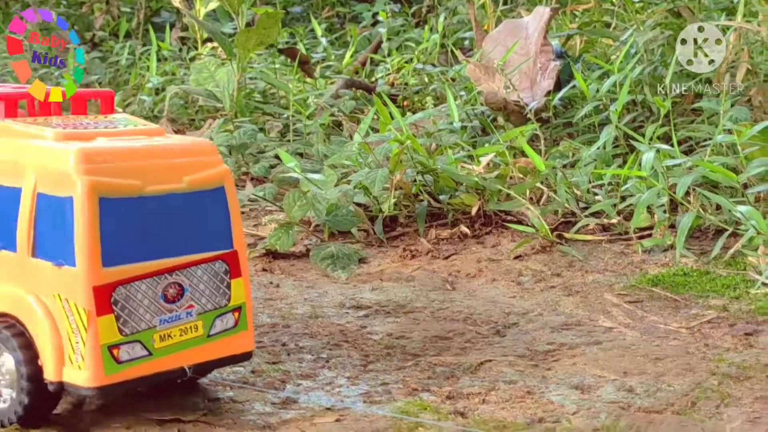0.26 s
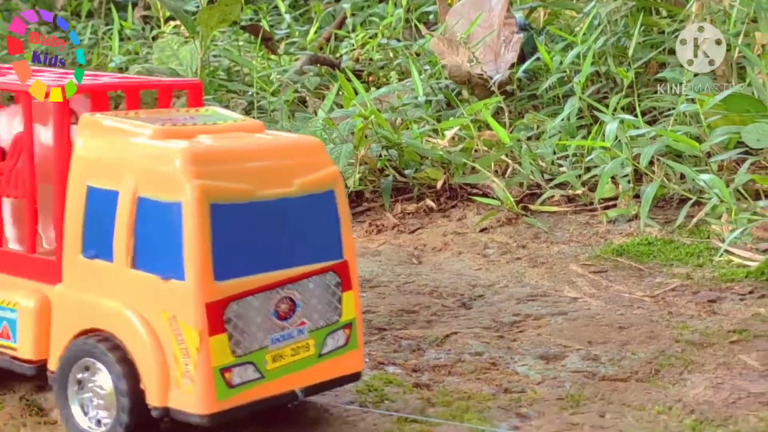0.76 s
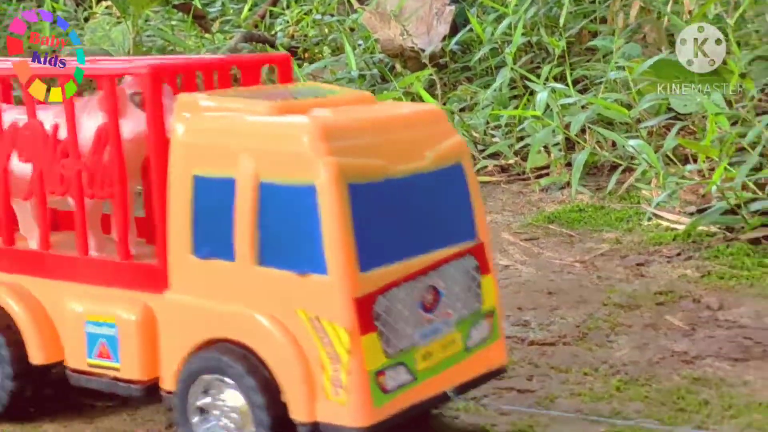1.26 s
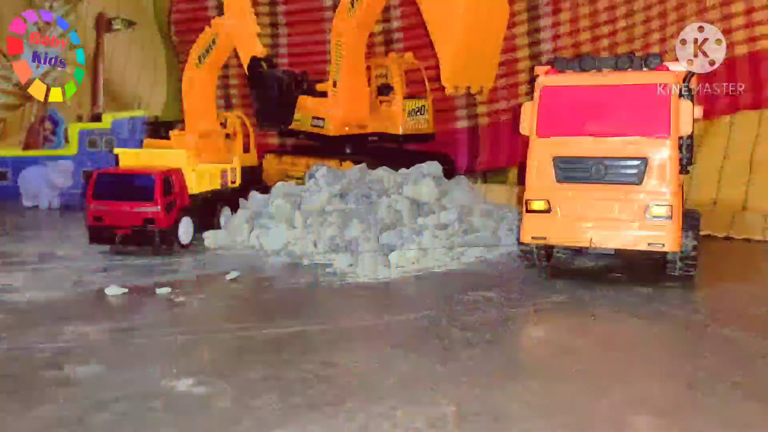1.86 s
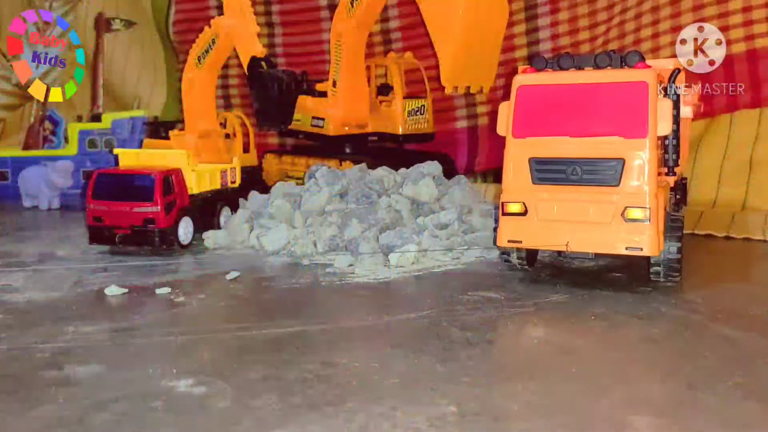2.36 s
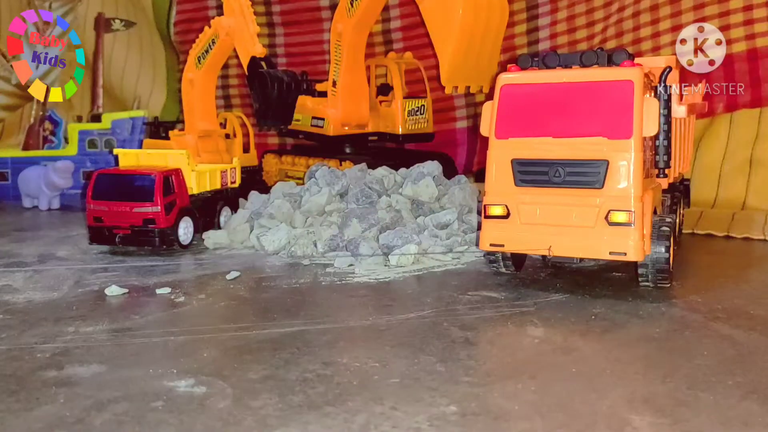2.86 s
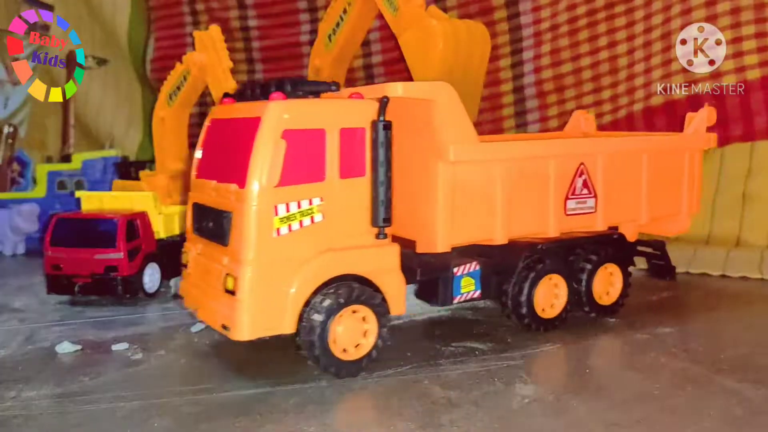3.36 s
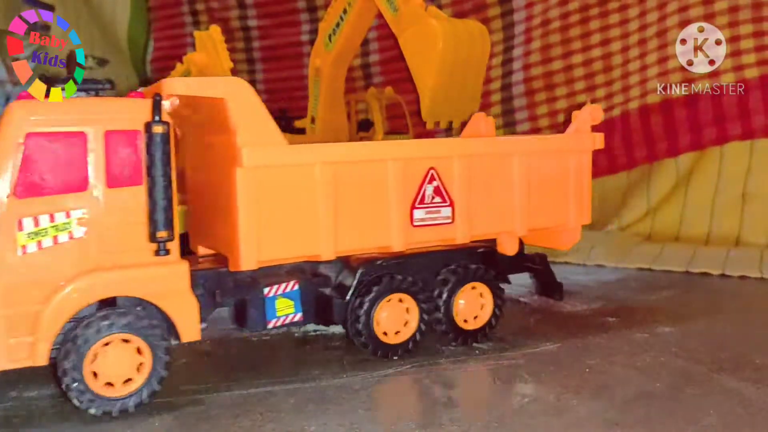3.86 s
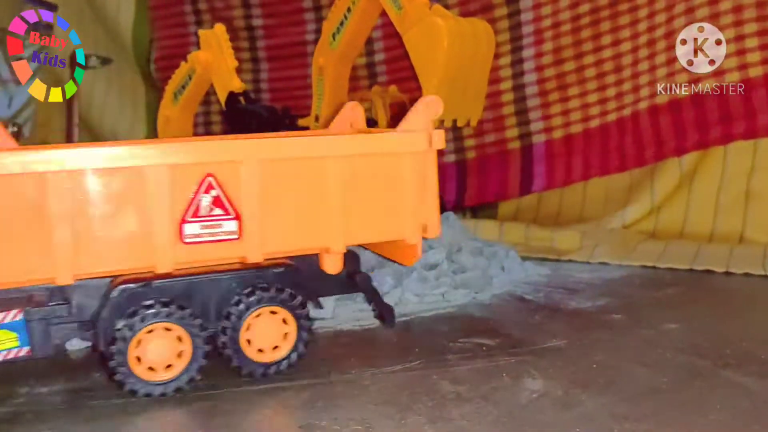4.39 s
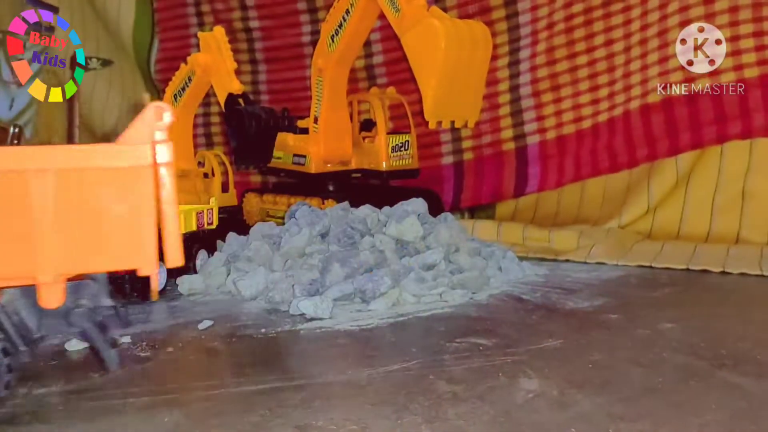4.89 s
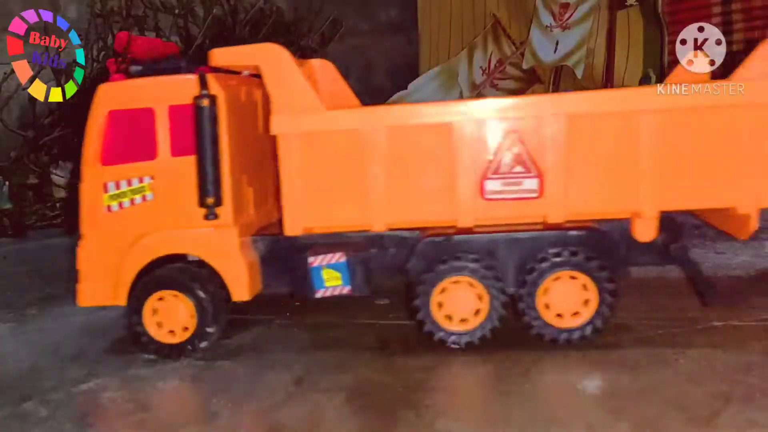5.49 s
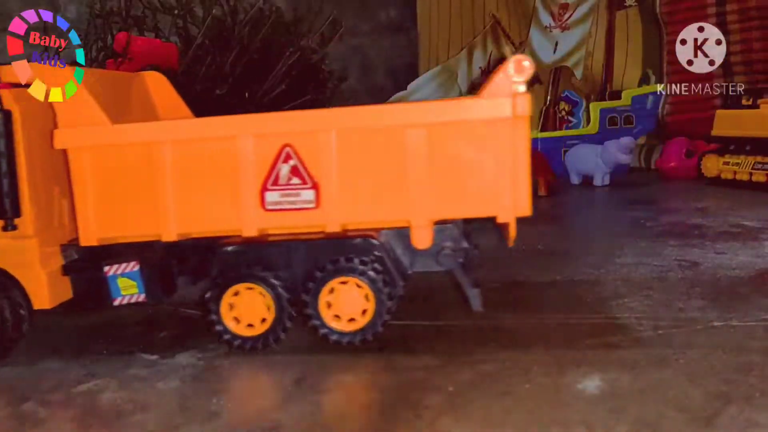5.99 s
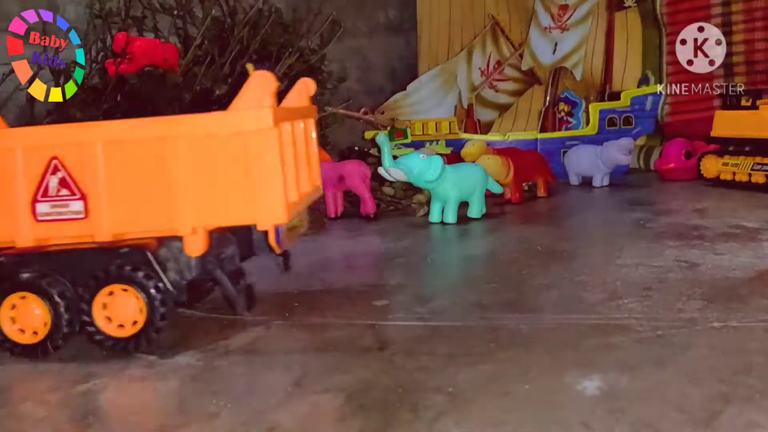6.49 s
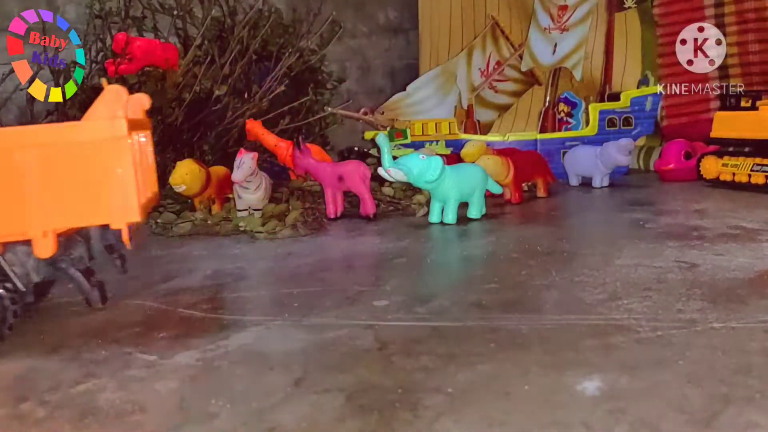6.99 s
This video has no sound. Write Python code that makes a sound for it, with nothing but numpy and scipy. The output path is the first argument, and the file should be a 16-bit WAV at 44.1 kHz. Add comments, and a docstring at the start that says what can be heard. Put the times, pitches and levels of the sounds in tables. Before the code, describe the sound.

A plastic toy truck rolls over concrete close by, its gears whirring and clicking, with a scrubbing shove and soft knocks.

```python
"""Flywheel toy truck on concrete

Close to a phone's microphone, a plastic truck's gears spin down, teeth clicking in the hollow shell. Two
seconds in, a shove scrubs the wheels and the truck turns, changing its tone. The whole run then sounds a second
time, overlapping the first as it whirs on. Soft knocks and a low rumble reach the phone through its body; a
rustle swells underneath."""
import sys
import numpy as np
from scipy import signal
from scipy.io import wavfile
from scipy.ndimage import uniform_filter1d

SR = 44100
rng = np.random.default_rng(int(sys.argv[2]) if len(sys.argv) > 2 else 0)


def store_pcm(level_fs):
    """Save levels as 16-bit WAV."""
    pcm = np.round(np.clip(level_fs, -1, 1) * 32767).astype(np.int16)
    wavfile.write(sys.argv[1], SR, np.atleast_2d(pcm).T)


N = 319328


def undb(db):
    return 10 ** (np.asarray(db) / 20)


def unit(x):
    return x / np.sqrt(np.mean(x ** 2))


def band(x, hz, width, passes=1):
    """Resonance of gain 1 at its centre; more passes steepen its sides."""
    for _ in range(passes):
        x = signal.lfilter(*signal.iirpeak(hz, hz / width, SR), x)
    return x


def notch(x, gaps, depth):
    """Cancel a share of each narrow band, twice over."""
    sections = []
    for hz, width in gaps:
        b, a = signal.iirpeak(hz, hz / width, SR)
        sections += [np.r_[a - depth * b, a]] * 2
    return signal.sosfilt(sections, x)


def curve(table, t):
    """Columns of a table read at times t."""
    times, *columns = np.transpose(table)
    return [np.interp(t, times, column) for column in columns]


def walk(size, rate):
    """Random levels held 1 / rate seconds and smoothed twice."""
    hold = int(SR / rate)
    steps = np.repeat(rng.standard_normal(size // hold + 1), hold)
    return 0.9 * uniform_filter1d(uniform_filter1d(steps, hold), hold)[:size]


def wander(size, per_s=18, drift_s=0.15):
    """Quick uneven surges with no slow drift."""
    surges = walk(size, per_s)
    return surges - uniform_filter1d(surges, int(drift_s * SR))


# The low bed at the phone. Each row: time in seconds, rumble level in dB, rustle level in dB.
BED_LEVELS = [(0.0, -64, -54), (0.12, -48, -63), (0.36, -47, -64), (0.44, -38, -44.5), (0.7, -43, -49.5),
              (0.87, -44.5, -52), (1.1, -46, -67), (1.89, -45, -66), (1.95, -39, -64), (2.08, -28, -51),
              (2.17, -38, -46.5), (2.4, -44, -55), (3.4, -47, -62.5), (4.4, -46.5, -68.5),
              (4.49, -34, -48.5), (4.7, -46, -55.5), (5.64, -41, -68.5), (6.0, -45.5, -63.5),
              (7.24, -46, -72)]
# The rustle's colour. Each row: centre in Hz, width in Hz, relative level in dB.
RUSTLE_BANDS = [(242, 61, 1.5), (388, 130, -7.5), (524, 87, -7.5), (720, 260, -1.5)]
def rumble_and_rustle(t, edge_hz=315):
    """A narrow rumble flutters through the phone's body over a faint broad rustle."""
    rumble_db, rustle_db = curve(BED_LEVELS, t)
    core = unit(band(band(rng.standard_normal(N), 105, 44), 111, 55))
    shoulder = undb(-14.5) * unit(band(rng.standard_normal(N), 260, 110))
    rumble = signal.sosfilt(signal.cheby2(8, 40, edge_hz, fs=SR, output="sos"), core + shoulder)
    rumble *= undb(4.1 * walk(N, 16))
    rustle = sum(undb(db + walk(N, 8)) * band(rng.standard_normal(N), hz, width, passes=2)
                 for hz, width, db in RUSTLE_BANDS)
    return unit(rumble) * undb(rumble_db) + unit(rustle) * undb(rustle_db)


# Knocks through the phone's body. Each row: time in seconds, level in dB, pitch in Hz,
# seconds to fall 60 dB, edge level in dB against the thud.
BODY_KNOCKS = [(1.429, -26, 114, 0.12, -19), (1.553, -23.5, 117, 0.086, -40), (1.964, -24, 123, 0.13, -13),
               (1.989, -3, 112, 0.091, -32), (2.021, -16.5, 100, 0.15, -9), (2.041, 3, 127, 0.046, -27),
               (2.093, -28, 133, 0.091, -29), (2.144, -24, 118, 0.047, -5), (2.243, -8, 112, 0.052, -22),
               (3.076, -31, 102, 0.084, -33), (3.953, -27, 110, 0.078, -17), (4.25, -26.5, 110, 0.086, -36),
               (4.287, -28, 97, 0.2, -19), (4.481, -32, 132, 0.073, -19), (4.495, -33, 144, 0.038, -6),
               (4.521, -20, 111, 0.073, -30), (4.621, -17, 106.6, 0.076, -35),
               (4.694, -29, 95.3, 0.16, -27), (5.015, -37, 103, 0.28, -25), (5.422, -26, 101.5, 0.099, -26),
               (5.486, -23, 121, 0.13, -16), (6.078, -32, 111, 0.18, -44), (6.755, -34, 99, 0.147, -35),
               (6.782, -26, 96.5, 0.2, -24), (6.999, -33, 106, 0.12, -25), (7.052, -24, 105, 0.17, -38),
               (7.074, -14.5, 120, 0.037, -37), (7.128, -28, 100, 0.11, -40)]
def body_knocks(hard_rise_s=0.0056, light_rise_s=0.0144, light_below_db=-14, edge_s=0.0025):
    """A soft push rings a low thud that sags in pitch; a dull edge marks its front."""
    out, t = np.zeros(N + SR), np.arange(SR // 4) / SR
    for start, db, hz, t60, edge_db in BODY_KNOCKS:
        rise = light_rise_s if db < light_below_db else hard_rise_s
        age = np.clip(t - rise + hard_rise_s, 0, None)  # time since the front
        cycles = hz * (t + 0.0029 * (1 - np.exp(-t / 0.005)))
        attack = np.sin(np.pi / 2 * np.clip(t / rise, 0, 1)) ** 2
        thud = np.sin(2 * np.pi * cycles) * attack * undb(-60 * age / t60)
        edge = np.sin(2 * np.pi * 265 * age) * age / edge_s * np.exp(1 - age / edge_s)
        at = int((start - rise + hard_rise_s) * SR)
        out[at:at + len(t)] += undb(db) * (thud + undb(edge_db) * edge)
    return out[:N]


# Sharper taps, right at the microphone. Each row: start in seconds, level in dB, pitch in Hz.
CASE_TAPS = [(1.994, -12, 240), (2.043, -10, 232), (2.045, -25, 556), (2.144, -35, 476), (4.494, -33, 390),
             (7.074, -34, 237), (1.972, -31, 330), (2.024, -22, 380)]
def case_taps(t, rise_s=0.0022):
    """A tap on the phone's case gives a few cycles of a dull click."""
    out = 0
    for start, db, hz in CASE_TAPS:
        age = np.clip(t - start, 0, 0.05)
        envelope = age / rise_s * np.exp(1 - age / rise_s)
        out -= undb(db) * np.sin(2 * np.pi * hz * age) * envelope
    return out


# Hum with the truck facing the microphone. Each row: start in seconds, length in seconds, level in dB.
FACING_HUMS = [(-0.5, 1.45, -51.5), (1.06, 0.16, -53), (1.27, 0.082, -52), (1.456, 0.056, -50),
               (1.57, 0.1, -52)]
# Hum with the truck turned away. Each row: time in seconds, level in dB.
TURNED_HUM = [(1.95, -89), (1.97, -46), (2.04, -42.5), (2.12, -47.5), (3.1, -48.5), (4.4, -52),
              (5.2, -49.5), (7.24, -66.5)]
# The facing hum, the turned hum and its undertone. Each row: centre in Hz, width in Hz.
HUM_PITCHES = [(670, 37), (587.7, 62), (387, 32)]
# Rings beside the turned hum. Each row: centre in Hz, width in Hz, level in dB against that hum.
SIDE_RINGS = [(532, 20.4, -7.5), (860, 40, -8)]
def cavity_hum(t, edge_s=0.065, undertone_holds_until_s=2.7, fall_db_per_s=22):
    """Grit rings the air in the shell: in spells at first, lower and unbroken after the turn."""
    facing = 0
    for start, length, db in FACING_HUMS:
        inside_s = np.minimum(t - start, start + length - t)
        facing += undb(db) * np.clip(inside_s / edge_s + 0.5, 0, 1) ** 2
    turned = undb(curve(TURNED_HUM, t)[0])
    undertone = turned * undb(-14.5 - fall_db_per_s * np.clip(t - undertone_holds_until_s, 0, None))
    voices = list(zip((facing, turned, undertone), HUM_PITCHES))
    voices += [(turned * undb(db), (hz, width)) for hz, width, db in SIDE_RINGS]
    out = 0
    for gain, (hz, width) in voices:
        ring = band(rng.standard_normal(len(t)), hz, 2 * width, passes=3)
        out += gain * unit(ring * undb(2.5 * walk(len(t), 25)))
    return out


# Wheels on the concrete. Each row: centre in Hz, width in Hz, relative level in dB,
# rise in seconds, stop time in seconds.
SCRUB_BANDS = [(1110, 500, -24, .045, 3.5), (1620, 760, -3.5, 0.017, 2.21), (2703, 260, 9.5, 0.049, 2.15),
               (2900, 170, 6, 0.1, 2.15), (3360, 220, 8, 0.11, 2.15), (3780, 500, 1, 0.19, 2.21),
               (2900, 1200, 2, 0.13, 2.21), (2050, 280, 2, 0.13, 2.2), (7000, 3000, -10, 0.05, 2.21)]
def wheel_scrub(t, start_s=2.015, fade_s=0.015, level_db=-20.5):
    """The wheels scrub and squeak as the shove winds the flywheel."""
    grit = rng.standard_normal(N) * undb(1.7 * walk(N, 170))
    steady = scrub = 0
    for hz, width, db, rise, stop in SCRUB_BANDS:
        ring = undb(db) * band(band(grit, hz, 2 * width), hz, width)
        attack = np.clip((t - start_s) / rise, 0, 1)
        release = np.exp(-np.clip(t - stop, 0, None) / fade_s)
        steady += ring
        scrub += ring * attack * release
    return scrub / np.std(steady) * undb(level_db)


# The plastic shell from close by. Each row: centre in Hz, width in Hz,
# gain in dB facing the microphone, gain in dB turned away.
SHELL_MODES = [(912, 120, 14, 12), (1213, 190, -6.5, -7.5), (1549, 195, 9.5, 5), (1731, 105, 5.5, 3),
               (2013, 140, -3, -13), (2210, 130, -8, -14.5), (2685, 32, 2, -4), (2916, 150, -0.5, -4),
               (3232, 460, -3, -7.5), (3544, 79, -10.5, -8), (3810, 190, 2.5, 0), (3980, 170, -2, -6),
               (4464, 110, -1, -1.5), (4650, 96, 3, -2.5), (4735, 58, -1, 1), (4813, 68, 3, 2.5),
               (4910, 61, 0.5, 2.5), (5160, 450, -14.5, -11.5), (5760, 180, -11.5, -12),
               (5995, 190, -21, -4), (5630, 190, -15.5, -6.5), (8500, 550, -40.5, -5)]
# Where the panels cancel at the microphone, facing and turned. Each row: centre in Hz, width in Hz.
FACING_GAPS = [(810, 41), (1107, 60), (1366, 36), (1637, 73), (2220, 107), (2214, 35), (2476, 42),
               (2577, 82), (3480, 70), (4120, 63), (4130, 43), (4270, 47), (1942, 54), (2366, 36),
               (2707, 26), (3150, 26), (4600, 16), (5090, 40), (6240, 140), (7430, 640)]
TURNED_GAPS = [(790, 40), (4100, 40), (6170, 83), (3410, 63), (3670, 50), (4530, 40), (5550, 92),
               (6270, 88)]
def shell(low, middle, top, t, sway_db=2.5, sways_per_s=12, turn_s=2.0, turn_takes_s=0.051):
    """Each mode rings from the drive of its range and sways as panels flex; the turn shifts the tone."""
    facing = turned = 0
    hop = 100
    coarse = np.arange(0, len(t), hop)
    for hz, width, facing_db, turned_db in SHELL_MODES:
        drive = low if hz < 2500 else middle if hz < 5100 else top
        if drive is not None:
            sway = undb(sway_db * walk(len(coarse), hop * sways_per_s))
            ring = band(drive, hz, width) * np.interp(np.arange(len(t)), coarse, sway)
            facing += undb(facing_db) * ring
            turned += undb(turned_db) * ring
    facing = notch(facing, FACING_GAPS, depth=0.54)
    turned = notch(turned, TURNED_GAPS, depth=0.18)
    turned = signal.sosfilt(signal.butter(3, 6300, fs=SR, output="sos"), turned)  # duller far side
    turned_share = np.clip((t - turn_s) / turn_takes_s + 0.5, 0, 1)
    return (1 - turned_share) * facing + turned_share * turned


def blows(t, starts, db, bright_db, chatter=0.23, chatter_s=0.0012, sway_db=1.5):
    """Short blows, each with its own tilt and a brief chatter, rung through the shell."""
    at = np.clip(((starts - t[0]) * SR).astype(int), 0, len(t) - 1)
    tilt_db = np.clip(bright_db, -9, 9) / 2
    impulses = np.array([np.bincount(at, undb(db + side * tilt_db), len(t)) for side in (-1, 1)])
    tails = signal.lfilter([1], [1, -np.exp(-1 / (chatter_s * SR))], impulses) - impulses
    dull, bright = impulses + chatter * tails * rng.standard_normal(len(t))
    middle = dull - 0.23 * band(dull, 2800, 940)  # a short blow hardly moves the flat panels
    return shell(0.32 * dull, middle, bright, t, sway_db)


# The clicks that stand out up close. Each row: start in seconds, level in dB, brightness in dB,
# swell of the surrounding clatter in dB.
HARD_BLOWS = [(0.018, -14, 11, 7), (0.1835, -10, 1, -2), (0.2811, -13.5, 3, 2), (0.3654, -15.5, 4, -1),
              (0.5189, -12, 1, -0.5), (0.581, -10, -1, 1.5), (0.6045, -11, 0, -2), (0.679, -12, -3, -2),
              (0.768, -9.5, 2, -0.5), (0.7407, -18, 6, 2.5), (0.7987, -9, 1, 0), (0.8323, -11.5, 2, 5.5),
              (0.888, -11, 3, 5), (0.9527, -7, 3, 0.5), (0.9793, -6, 8, 3.5), (1.0258, -18, 0, 6),
              (1.127, -13.5, -5, 6), (1.1545, -13, 0, 3.5), (1.18, -8, 5, -1), (1.194, -11, -3, 1.5),
              (1.219, -9, 2, 2), (1.3844, -14, -2, 1.5), (1.5868, -8.5, 7, 7.5), (1.6393, -11, 10, 5),
              (1.6695, -9.5, 2, 0.5), (1.6947, -16, 6, -4.5), (2.076, -9, 12, 0.5), (2.0992, -5, 6, 3.5),
              (2.138, -14, 9, -0.5), (2.1774, -8.5, -11, -1.5), (2.1945, -8.5, -12, -0.5),
              (2.2408, -9, 1, 1), (2.2761, -14, -9, 6.5), (2.3413, -11, 10, 9.5), (2.5808, -4.5, 7, -4.5),
              (2.7036, -10, 5, 6.5), (2.681, -3.5, 6, 8.5), (2.7198, -1.5, 8, 5), (2.729, -8, 14, 3),
              (2.8442, -2, 5, 0.5), (2.852, -8, 6, 5), (2.856, -11, -1, 10.5), (2.9931, -2, 7, 0),
              (3.0014, -2.5, 13, 2), (3.0633, -9.5, 4, 5.5), (3.2176, -6.5, -6.5, -1), (3.227, -5, -4, 5.5),
              (3.2912, -6.5, -3, 4.5), (3.4472, -2, 8, -4), (3.505, -7, -1, 4), (3.581, -5.5, 3, 9.5),
              (3.749, -6, 4, 5.5), (3.922, -4.5, 5, 5.5), (4.107, -9, 4, 2), (4.1153, -6, 6, -0.5),
              (4.186, -6.5, 0, 3), (4.2232, -7, 5, 2.5), (4.4688, -7, 7, -2.5), (4.563, -6, 6, 6),
              (4.572, -2.5, 5, 3), (4.647, -8, 2, 5.5), (4.5978, -16, 9, 0.5), (4.656, -6.5, 6, 6),
              (4.6646, -2.5, 4, 7), (4.694, -6.5, 4, -3.5), (4.887, -4.5, 10, 1.5), (5.2833, -7, 1, 4.5),
              (5.3879, -6, 1, 9.5), (5.4346, -8.5, -3, 11.5), (5.497, -4, 3.0, 9.5), (5.5182, -5.5, -8, 5),
              (5.5732, -10, -3, 3.5), (5.5913, -7, 0.0, 3.5), (5.6655, -3, -6, 4), (5.7712, -6, 0, 9),
              (5.8, -9, -4, 8), (5.8678, -4, 4, 5.5), (6.141, -3.5, 4, 8.5), (6.159, -7, 1, 1),
              (6.218, -3.5, 8, 2.5), (6.3375, -7.5, -2, 1), (6.3536, -10, 1, 5.5), (6.207, -2.5, -1, 0.5),
              (6.2976, -12, 6, -2), (6.5486, -13, 4.0, 8.5), (6.571, -13, 9, 2.5), (6.7, -13, -1, 2),
              (6.7121, -4, 5, 5), (6.878, -8, -3, 4), (7.0265, -6.5, 0, 1), (7.0476, -5, 2, 2),
              (7.061, -11, 6, 10.5)]
def hard_blows(t):
    """The hardest tooth blows chatter more faintly but longer than the rest."""
    starts, db, bright_db, _ = np.transpose(HARD_BLOWS)
    clicks = blows(t, starts, db, bright_db, chatter=0.07, chatter_s=0.003, sway_db=0)
    impulse = signal.unit_impulse(SR // 10)
    unit_click = shell(None, impulse, impulse, np.zeros_like(impulse), sway_db=0)
    return clicks / np.abs(unit_click).max()


# The flywheel running down. Each row: time in seconds, teeth meeting per second.
TOOTH_RATE = [(-0.3, 171.77), (0.15, 167.86), (0.75, 158.39), (1.35, 150.36), (1.95, 140.82),
              (2.54, 131.67), (3.14, 124.6), (3.74, 117.09), (4.34, 109.75), (4.94, 102.2), (5.54, 96.19),
              (6.14, 90.06), (6.73, 84.81), (7.3, 80.66)]
def tooth_count(t, first_step=0.84):
    """Tooth steps turned by time t, counted from first_step at the table's first row."""
    count = np.cumsum(curve(TOOTH_RATE, t)[0]) / SR
    return count + first_step - np.interp(TOOTH_RATE[0][0], t, count)


# Off-centre shafts. Each row: teeth per turn, swing in dB at mid-run, phase in turns.
SHAFT_WOBBLE = [(34.94, 0.78, 0.98), (9.174, 1, 0.87), (7.13, 1.5, 0.64)]
def mesh_tightness(t, growth_per_s=0.33, swell_s=0.012):
    """How hard the teeth bear, in dB: tighter once a shaft turn, swelling around hard blows."""
    count = tooth_count(t)
    swing = sum(db * np.cos(2 * np.pi * (count / teeth - phase)) for teeth, db, phase in SHAFT_WOBBLE)
    swing *= 1 + growth_per_s * (t - t.mean())  # deepens as the spin slows
    coarse = t[::100]
    swells = [db * np.exp(-((coarse - at) / swell_s) ** 2) for at, _, _, db in HARD_BLOWS]
    swell = np.interp(t, coarse, np.max(swells, axis=0))
    return swing + swell - swell.mean()


def tooth_clicks(t, surge_db, scatter_db=5.5, slip_s=0.0002, ceiling_db=2.5, rebound_db=-9):
    """One blow for each tooth, uneven in force and colour, with a rebound half a step later."""
    count = tooth_count(t)
    half_steps = np.arange(2 * np.ceil(count[0]) + 2, 2 * np.floor(count[-1]) - 2)
    slip, force, colour = rng.standard_normal((len(half_steps), 3)).T
    starts = np.interp(half_steps / 2, count, t) + slip_s * slip
    # Loose play makes neighbours strike alike and limits how hard they strike.
    db = scatter_db * force + 1.5 * np.interp(starts, t, walk(len(t), 30))
    db = np.minimum(db, ceiling_db) + np.interp(starts, t, surge_db)
    db = np.minimum(db, ceiling_db) + rebound_db * (half_steps % 2)
    to_hard_blow_s = np.abs(starts[:, None] - np.array(HARD_BLOWS)[:, 0]).min(axis=1)
    free = to_hard_blow_s > 0.0015  # a hard blow takes the place of its tooth
    return unit(blows(t, starts[free], db[free], 3 * colour[free]))


# Brief dips in the clatter. Each row: centre in seconds, depth in dB.
LULLS = [(0.17, 2), (0.29, 12), (0.355, 4.5), (0.525, 0.5), (0.995, 6), (1.335, 9), (1.516, 12), (1.75, 9),
         (2.82, 1), (3.03, 7), (3.1, 0), (3.38, 4), (3.72, 11), (3.88, 3), (4.31, 12), (5.34, 3), (5.55, 4),
         (5.62, 4), (5.9, 13), (6.24, 2), (6.4, 9), (6.83, 2)]
def lulls(t, half_width_s=0.0074):
    """Gain that dips as the gears fall quiet for an instant."""
    return undb(-sum(db * np.exp(-((t - at) / half_width_s) ** 2) for at, db in LULLS))


# The gears near the microphone. Each row: time in seconds, whir level in dB, clatter level in dB.
GEAR_LEVELS = [(-0.56, -32, -38), (-0.48, -22, -33), (-0.2, -30.5, -35), (0.1, -29, -34), (0.45, -28, -34),
               (0.6, -28.5, -31.5), (0.72, -25, -31.5), (0.8, -27.5, -32.5), (0.92, -28, -31.5),
               (1.0, -30.5, -31.5), (1.45, -29.5, -33), (1.9, -28.5, -30.5), (2.1, -24, -26.5),
               (2.6, -26, -28.5), (3.5, -26.5, -29), (4.4, -27.5, -28.5), (5.1, -27.5, -30),
               (6.2, -30, -28.5), (7.24, -27, -32)]
def gears(t):
    """Tooth blows over the gritty whir of the fast pinion; the shell is too small to send out bass."""
    whir_db, clatter_db = curve(GEAR_LEVELS, t)
    tight_db = mesh_tightness(t)
    whir_db += 0.18 * tight_db + 1.5 * wander(len(t))
    surge_db = tight_db + 3.5 * wander(len(t))
    grit = rng.standard_normal(len(t)) * undb(2.2 * walk(len(t), 200) + 2 * walk(len(t), 25))
    whir = unit(shell(grit, None, None, t))
    hiss = unit(shell(None, grit, 0.36 * grit, t))
    clatter = 1.07 * tooth_clicks(t, surge_db) + 0.32 * hiss * undb(surge_db)
    dips = lulls(t)
    mix = whir * undb(whir_db) * dips ** 0.41 + clatter * undb(clatter_db) * dips + hard_blows(t)
    return signal.sosfilt(signal.cheby2(8, 55, 800, "high", fs=SR, output="sos"), mix)


def scene(lead_s=0.56, repeat_delay_s=2.52, fade_in_s=0.076):
    """In mono: the run is already under way at time zero, and its repeat fades in at the shove."""
    t, lead = np.arange(N) / SR, int(lead_s * SR)
    run_t = np.arange(N + lead) / SR - lead_s
    run = gears(run_t) + cavity_hum(run_t)
    start = int((repeat_delay_s - lead_s) * SR)
    repeat = np.r_[np.zeros(start), run[:N - start]] * np.clip((t - start / SR) / fade_in_s, 0, 1)
    truck = run[lead:] + repeat + wheel_scrub(t)
    return (truck + body_knocks() + case_taps(t) + rumble_and_rustle(t))[None]


def record(dry, bass_hz=75, top_hz=7620, fizz_top_hz=10100):
    """Deep bass and high treble are cut; a very faint fizz remains up to 10 kHz."""
    out = signal.sosfilt(signal.butter(4, bass_hz, "high", fs=SR, output="sos"), dry) + 0.0045 * dry
    fizz = undb(-25) * out
    out = signal.sosfiltfilt(signal.ellip(8, 0.2, 30, top_hz, fs=SR, output="sos"), out) + fizz
    return signal.sosfilt(signal.ellip(8, 0.5, 60, fizz_top_hz, fs=SR, output="sos"), out)


dry = scene()
out = record(dry)
store_pcm(out)
```